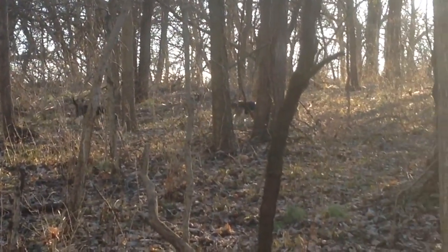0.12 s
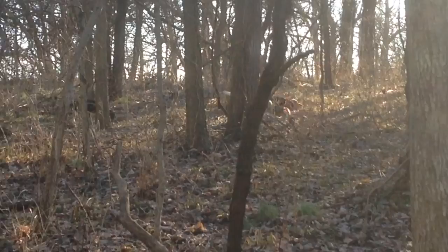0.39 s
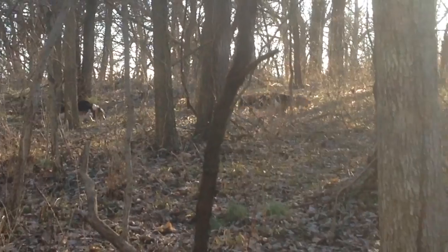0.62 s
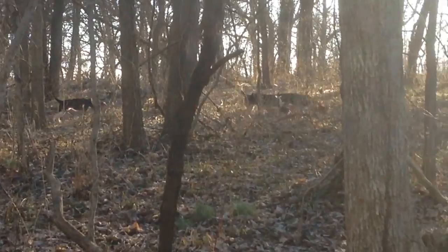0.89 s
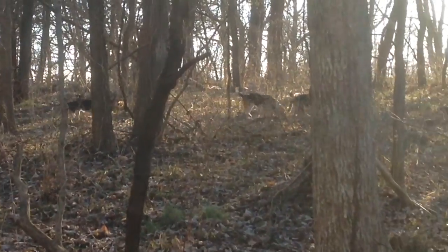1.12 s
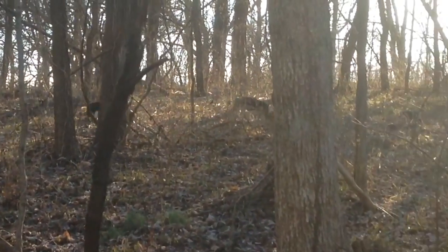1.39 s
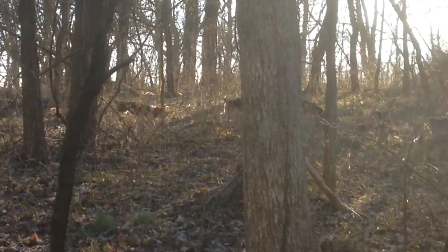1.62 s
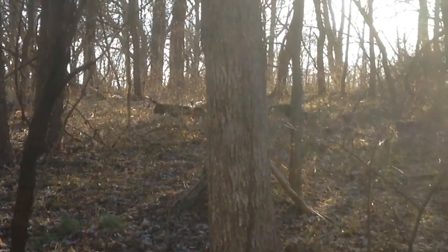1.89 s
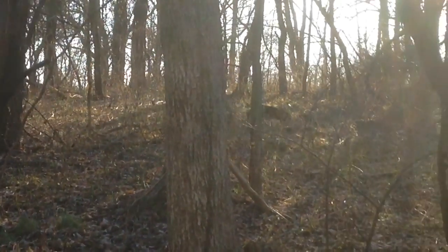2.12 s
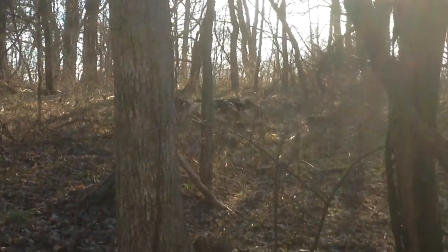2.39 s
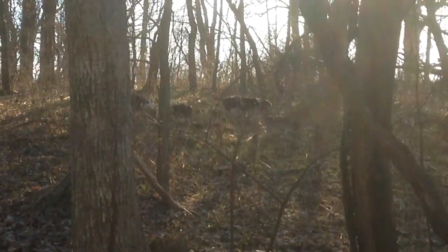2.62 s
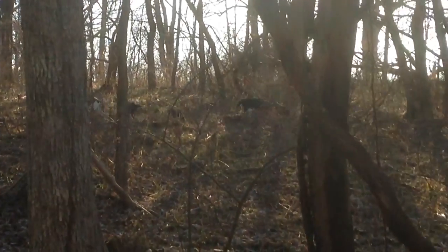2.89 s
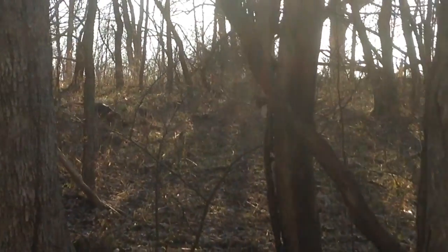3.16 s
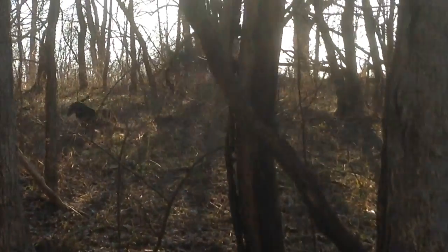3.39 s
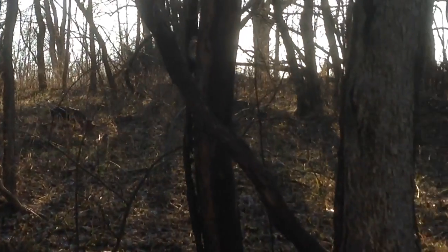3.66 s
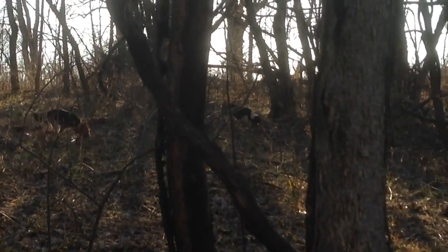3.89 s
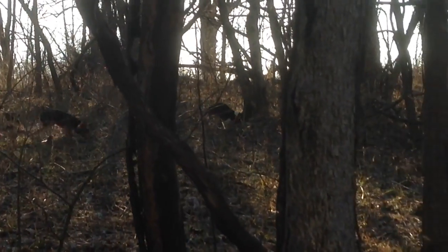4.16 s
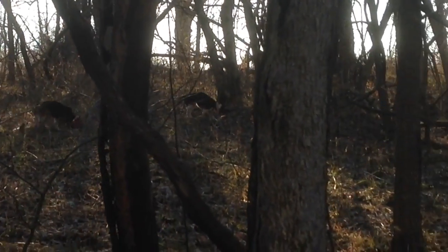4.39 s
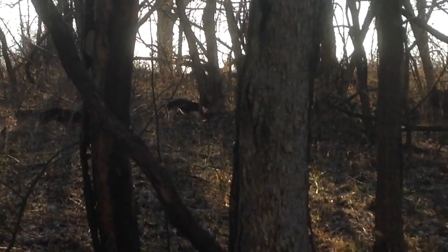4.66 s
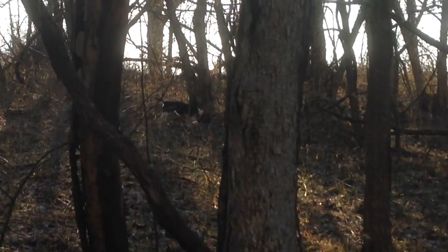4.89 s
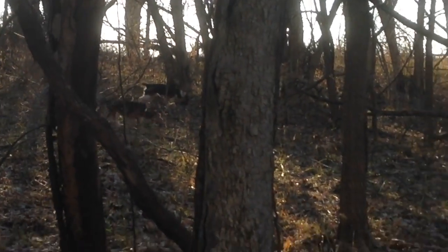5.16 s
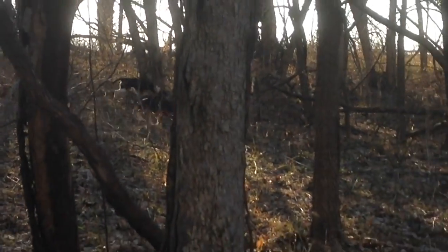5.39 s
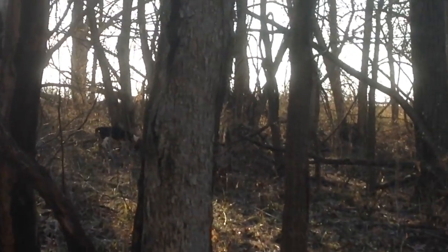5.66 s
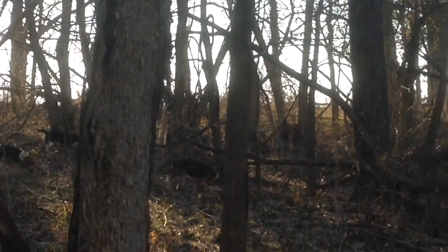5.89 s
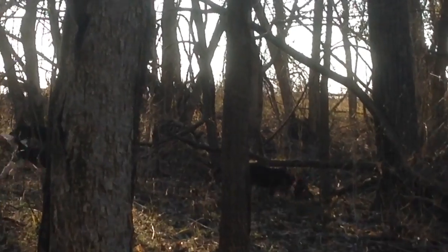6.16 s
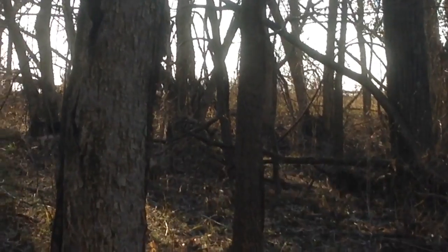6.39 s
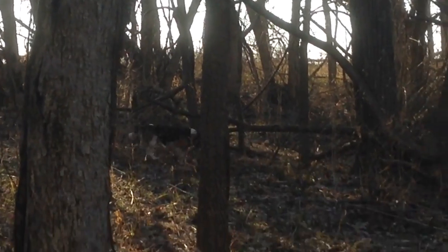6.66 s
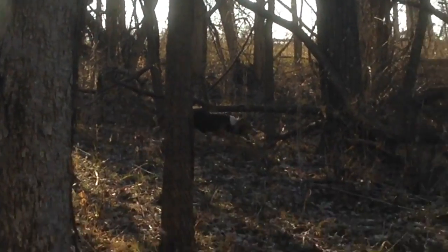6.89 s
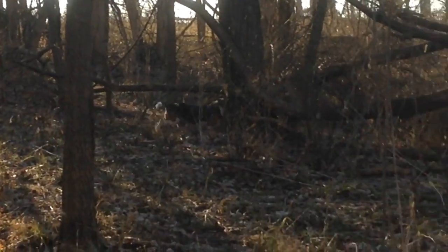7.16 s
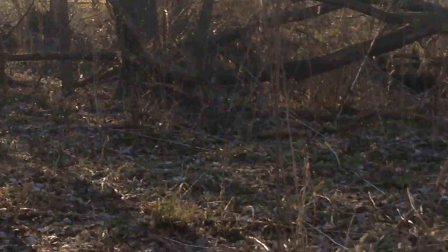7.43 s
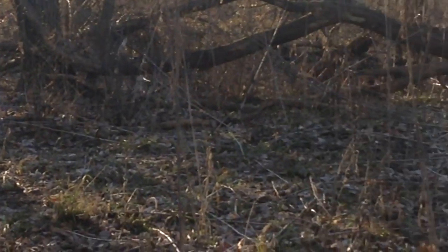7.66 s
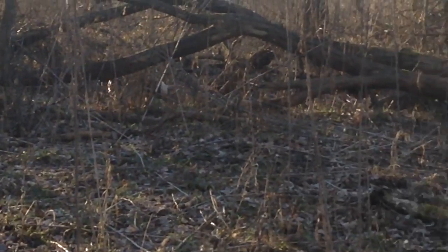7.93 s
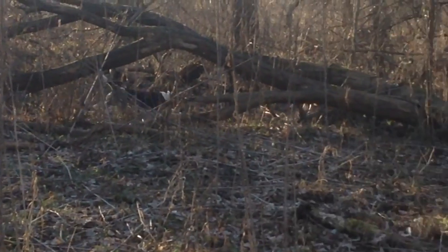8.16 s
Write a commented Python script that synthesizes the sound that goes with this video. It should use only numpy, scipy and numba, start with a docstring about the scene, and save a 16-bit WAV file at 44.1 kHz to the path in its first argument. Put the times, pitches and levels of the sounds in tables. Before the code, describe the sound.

In open bare woodland, several hounds bark and bay on the run some tens of metres from the microphone. From 0 to 0.9 s there are short hoarse barks, a very faint bay and small high yelps. Around 0.9-1.5 s a clear howl rises and another sags, then from 1.7 to 3.3 s rough barks alternate with short hooting bays, some dropping away in pitch, while leaves crackle most near 2.7 s and twigs snap. A brief lull follows; a quick rising howl comes at 3.8 s and faint bird chips around 4 s. From 4.3 s barks are louder, with squeaky yelps near 5 s and a longer wavering howl at 5.2-5.6 s. From 6 s to about 8 s strong barks and bays nearly coincide, with a sharp twig snap at 6.6 s. Every voice leaves a short, dense echo over soft leaf rustle and faint far rumble, which remain at the end, 8.3 s.

```python
"""Bare winter woods: a pack of hounds runs a scent trail some tens of metres away.
Hoarse barks are chaotic pulses and noise through throat resonances; bays and high yelps are wavering partials.
The voices ring on among the trunks as a dense noise tail. Dry leaves crackle, twigs snap as short noise bursts,
a small bird chips in sliding sines, and banded noise rumbles far off."""
import sys
import numpy as np
from scipy import signal
from scipy.io import wavfile
from scipy.ndimage import uniform_filter1d
from numba import njit

SR = 44100
rng = np.random.default_rng(int(sys.argv[2]) if len(sys.argv) > 2 else 0)


def nominal_scale(level):
    """Amplitude ratio for a level in decibels (scalar or array-like)."""
    x = np.asarray(level, float) / 20
    return 10 ** x


def persist_wave(psi):
    """Save psi, clipped to +-1, as 16-bit WAV."""
    counts = np.round(np.clip(psi, -1, 1) * 32767).astype(np.int16)
    wavfile.write(sys.argv[1], SR, np.atleast_2d(counts).T)


N = 365588  # samples, about 8.3 s
T = np.arange(N) / SR


def level(x, db):
    """Set the rms level in dB."""
    return x * nominal_scale(db) / np.sqrt(np.mean(x ** 2))


@njit
def svf(x, hz, width):
    """State-variable band-pass with a moving centre, gain 1 at the centre."""
    y, b, l = np.empty(len(x)), 0., 0.
    for i in range(len(x)):
        g, k = np.tan(np.pi * hz[i] / SR), width / hz[i]
        v = (b + g * (x[i] - l)) / (1 + g * (g + k))
        b, l, y[i] = 2 * v - b, l + 2 * g * v, k * v
    return y


def band(x, hz, width):
    """The same band-pass twice, for steep skirts."""
    hz = hz * np.ones(len(x))
    return svf(svf(x, hz, 1. * width), hz, 1. * width)


def walk(rate, size=N):
    """Smooth chance with spread 1 that changes about rate times a second."""
    k = max(int(SR / rate), 1)
    smooth = uniform_filter1d(uniform_filter1d(rng.standard_normal(size + 4 * k), k), k)
    return smooth[2 * k:2 * k + size] * np.sqrt(1.5 * k)


def calls(curves, voice, rise_s, fall_s):
    """Play each call from its curves, with a soft start and end."""
    out = np.zeros(N)
    for rows in curves:
        s, *columns = np.transpose(rows)
        a, b = int(s[0] * SR), min(int(s[-1] * SR), N)
        t = T[a:b]
        fade = np.clip(np.minimum((t - s[0]) / rise_s, (s[-1] - t) / fall_s), 0, 1)
        out[a:b] += fade * voice(*(np.interp(t, s, c) for c in columns))
    return out


def partials(hz, weights, waver, rasp, settle_s, patchy=0.5):
    """Sines on multiples of a wavering pitch; overtones flutter until the voice settles, and come and go."""
    n = len(hz)
    unrest = np.exp(-(T[:n] / settle_s) ** 3)
    wavering_hz = hz * (1 + waver * (0.65 + unrest) * walk(139.3, n))
    phase = 2 * np.pi * np.cumsum(wavering_hz) / SR

    def flutter(m):
        rough = rasp * (m != 1) * (0.22 + unrest) * walk(206, n)
        patches = patchy * (m > 2) * np.maximum(unrest, m / 12) * walk(28.1, n)
        return 1 + rough + patches

    return np.sqrt(2) * sum(g * flutter(m) * np.sin(m * phase + m * m) for m, g in weights)


# throat resonances around the bark: (centre [Hz], width [Hz], gain [dB])
THROAT_RESONANCES = [(247, 190, -26.5), (538, 92.6, -3.5), (906, 104.5, -11), (1600, 119, -23),
                     (2100, 190, -26.5), (2600, 580, -45.5)]
# mouth resonances that colour the breath: (centre [Hz], width [Hz], gain [dB])
BREATH_RESONANCES = [(2900, 2100, 0), (5010, 1700, 2.5), (7150, 2700, 1), (11250, 7100, -6)]


def bark(hz, db, rasp_db, hiss_db):
    """Vocal folds flap chaotically near the throat resonance: ragged pulses, torn rasp, a rush of breath."""
    n = len(hz)
    phase = np.cumsum(hz * (1 + 0.077 * walk(300, n))) / SR % 1
    flaps = nominal_scale(5.3 * np.tanh(walk(95.0, n))) * (np.exp(-phase / 0.042) - .12)
    folds = level(flaps, 0) + 1.51 * rng.standard_normal(n)
    throat = band(band(folds, hz, 150), hz, 150)
    jaw = 1 + 0.093 * walk(12.9, n)  # the jaw moves the upper resonances
    torn = nominal_scale(3 * np.tanh(walk(70, n)))  # rasp and breath come in uneven bursts
    for centre_hz, width_hz, gain_db in THROAT_RESONANCES:
        if centre_hz > 900:
            throat = throat + nominal_scale(gain_db + rasp_db) * torn * band(folds, centre_hz * jaw, width_hz)
        else:
            throat = throat + nominal_scale(gain_db) * band(folds, centre_hz, width_hz)
    puffs = .5 + np.exp(-phase / 0.21)
    breath = rng.standard_normal(n) * puffs * torn * nominal_scale(2.7 * walk(30, n))
    hiss = sum(nominal_scale(d) * band(breath, f * jaw, w) for f, w, d in BREATH_RESONANCES)
    return nominal_scale(db) * level(throat, 0) + nominal_scale(hiss_db) * level(hiss, 0)


BARK_ATTACK_S, BARK_START_DB, BARK_RELEASE_S, BARK_END_DB = 0.029, -9.5, 0.035, -6.5
HISS_START_DB, HISS_PEAK_AT, HISS_END_DB = -12, 0.55, -8  # the breath peaks at this share of the length
RASP_START_DB, RASP_LAG_S = -4.5, 0.02  # the upper throat joins in late


def bark_shape(s, length, first_hz, last_hz, db, rasp_db, hiss_db):
    """Attack, hold, release; the throat resonance slides steadily, the breath swells and fades."""
    t = np.linspace(0, length, num=16)
    hz = first_hz + (last_hz - first_hz) * t / length
    corners = [0, min(BARK_ATTACK_S, length / 2), max(length - BARK_RELEASE_S, length / 2), length]
    bark_db = db + np.interp(t, corners, [BARK_START_DB, 0, 0, BARK_END_DB])
    late_rasp_db = rasp_db + RASP_START_DB * np.exp(-(t / RASP_LAG_S) ** 2)
    from_peak = t / length - HISS_PEAK_AT
    before_db = HISS_START_DB * (from_peak / HISS_PEAK_AT) ** 2
    after_db = HISS_END_DB * (from_peak / (1 - HISS_PEAK_AT)) ** 2
    swell_db = np.where(from_peak < 0, before_db, after_db)
    return np.c_[s + t, hz, bark_db, late_rasp_db, hiss_db + swell_db]


# hoarse barks: (start [s], length [s], first throat resonance [Hz], last throat resonance [Hz],
# held level [dB], upper throat rasp [dB], peak breath hiss [dB])
HOARSE_BARKS = [(0.081, 0.14, 667, 654.6, -24, 8.5, -60.5), (0.474, 0.22, 680, 663.5, -27, 7.5, -49),
                (0.772, 0.1, 674, 670, -25.5, 8, -51), (1.316, 0.16, 668.4, 635, -21.5, 3.5, -60),
                (1.747, 0.18, 643.4, 629, -23.5, 2.5, -53.5), (2.191, .18, 778, 675, -23, -1, -45),
                (2.689, .15, 779.5, 705, -24, 7.5, -39), (3.237, .16, 690.8, 705, -23, 5, -41.5),
                (4.259, 0.14, 684, 675, -18, 6, -47), (4.697, 0.16, 689, 652.5, -16, -0.5, -55),
                (4.998, 0.087, 672.4, 665, -20.5, 4.5, -58), (5.238, 0.066, 642, 636, -26.5, 11, -68),
                (5.483, 0.15, 652.7, 673.7, -16.5, 3, -55), (5.653, 0.087, 738.5, 719, -29, 15, -72),
                (6.052, 0.14, 688.3, 684.6, -16, 3.5, -46.5), (6.436, 0.19, 688.5, 623, -22.5, 3, -57),
                (6.668, 0.069, 744, 642, -17.5, 3.5, -73), (7.218, 0.14, 716, 627.5, -17.5, 3.5, -51),
                (7.784, 0.17, 745.5, 639.6, -21, 8, -50)]


def barks():
    """Hoarse voices: chaotic folds driving a sliding throat resonance."""
    return calls([bark_shape(*row) for row in HOARSE_BARKS], bark, rise_s=0.012, fall_s=0.02)


MOUTH_WIDTH_HZ, MOUTH_RASP_DB, MOUTH_HISS_DB = 404, -9, -24  # rasp and hiss relative to the overtones
UPPER_THROAT_HZ, UPPER_THROAT_DB = 2700, -26


def bay(hz, db, second_db, upper_db, mouth_hz):
    """A howl: clear fundamental; overtones and breath are shaped by the mouth resonance."""
    n = len(hz)

    def resonance(m, centre_hz, width_hz):
        return 1 / (1 + ((m * hz - centre_hz) / width_hz) ** 2) ** 2

    def overtone(m):
        upper_throat = nominal_scale(UPPER_THROAT_DB) * resonance(m, UPPER_THROAT_HZ, 1800)
        return 0.015 / m + resonance(m, mouth_hz, MOUTH_WIDTH_HZ) + upper_throat

    weights = [(1, nominal_scale(db)), (2, nominal_scale(second_db))]
    weights += [(m, nominal_scale(upper_db) * overtone(m)) for m in range(3, 12)]
    voice = partials(hz, weights, waver=0.01, rasp=0.27, settle_s=0.22)
    breath = rng.standard_normal(n)
    rasp = level(band(breath, 0.96 * mouth_hz, 860), MOUTH_RASP_DB)
    rasp = rasp * (0.28 + np.exp(-(T[:n] / 0.093) ** 2))  # roughest at the onset
    hiss = level(band(breath, 3700, 8300), MOUTH_HISS_DB)
    voice += nominal_scale(upper_db) * (rasp + hiss)
    return nominal_scale(1.8 * walk(30, n)) * voice


BAY_START_DB, BAY_ONSET_S, BAY_ONSET_DB, BAY_END_DB = -20.5, 0.17, -8, -6.5
SCOOP_S = 0.0734  # time constant of the climb to the top pitch
SECOND_FADE_DB_PER_S, OVERTONE_FADE_DB_PER_S = 48.5, 63
MOUTH_OPEN_HZ, MOUTH_CLOSING_HZ_PER_S = 2100, 3800


def bay_shape(s, swell, length, hz, scoop, db, second_db, upper_db):
    """The tone sets in, swells and dies; pitch scoops up; overtones fade as the mouth closes."""
    t = np.linspace(0, length, num=12)
    scooped_hz = hz * (1 - scoop * np.exp(-t / SCOOP_S))
    corners = [0, min(BAY_ONSET_S, swell / 2), swell, length]
    tone_db = db + np.interp(t, corners, [BAY_START_DB, BAY_ONSET_DB, 0, BAY_END_DB])
    from_middle = t - length / 2
    return np.c_[s + t, scooped_hz, tone_db, second_db - SECOND_FADE_DB_PER_S * from_middle,
                 upper_db - OVERTONE_FADE_DB_PER_S * from_middle, MOUTH_OPEN_HZ - MOUTH_CLOSING_HZ_PER_S * t]


# short clear bays: (start [s], swell [s], length [s], top pitch [Hz], start below top pitch [share],
# peak level [dB], second partial at mid-length [dB], upper overtones at mid-length [dB])
CLEAR_BAYS = [(0.0, 0.056, 0.3, 547, 0.13, -37, -56, -70),
              (1.335, 0.0077, 0.14, 589.5, 0.16, -22.5, -34.5, -60),
              (1.719, 0.14, 0.17, 548.7, .14, -16.5, -46.5, -52),
              (2.307, 0.16, 0.16, 504.4, 0.15, -19, -51.5, -44.5),
              (2.919, 0.14, 0.15, 558, .18, -15, -48, -45),
              (6.147, 0.12, 0.13, 556, 0.066, -14.5, -40, -34),
              (6.688, 0.072, 0.16, 558.3, .1, -14, -39.5, -36),
              (7.275, 0.066, 0.13, 546, 0.082, -17.5, -40, -42),
              (7.833, 0.088, 0.14, 528, 0.017, -17.5, -35, -39.5),
              (6.841, 0.03, 0.056, 617, 0.12, -50, -37, -45)]
# howls that follow their own course, one list each: (time [s], pitch [Hz], level [dB],
# second partial [dB], upper overtones [dB], mouth resonance [Hz])
FREE_HOWLS = [
    [(0.86, 470.3, -34, -47, -40.5, 1770), (0.894, 481.3, -22, -24.5, -36, 1770),
     (0.946, 496, -24.5, -43, -45, 1880), (1.0, 526, -20, -60, -58, 1830),
     (1.048, 590, -20, -58, -56, 2670), (1.09, 648, -23, -63, -66, 2600)],
    [(1.03, 527.3, -26, -56, -51, 1600), (1.088, 514, -27, -42, -52, 1600),
     (1.134, 504.3, -24.5, -68, -50.5, 1500), (1.21, 488, -27.5, -42, -47, 1480),
     (1.288, 461, -37, -46, -49, 1490), (1.335, 475, -22.5, -39, -44, 1500)],
    [(3.77, 496, -50, -50, -46, 1600), (3.784, 504, -27, -37.5, -43, 1600),
     (3.83, 532, -21.5, -32.5, -36, 1804), (3.866, 549.5, -16.5, -34, -43.5, 1770),
     (3.91, 571.4, -24, -40, -36, 1860), (3.94, 589, -57, -41, -46, 1750)],
    [(5.6, 533.4, -37, -27, -33.5, 2100), (5.64, 554, -46, -31.5, -36.5, 2320),
     (5.665, 532, -43, -27, -32, 2100), (5.69, 490.5, -38, -34, -39, 2230),
     (5.73, 508, -33, -30, -43, 2140), (5.765, 511.7, -38, -35, -60, 2000), (5.8, 529, -55, -26, -47, 1920)],
    [(5.236, 468, -41, -53, -20, 1950), (5.25, 483, -29.5, -46, -26, 1900),
     (5.265, 484.2, -27.5, -39, -26, 2190), (5.283, 489.3, -26.5, -29, -36, 2200),
     (5.304, 521, -20.5, -42, -28, 1700), (5.348, 545.3, -20, -40, -34, 1700),
     (5.385, 532.5, -21, -30.5, -31.5, 1580), (5.418, 556, -23.5, -31.5, -28.5, 1660),
     (5.458, 551.7, -23.5, -44, -29, 1760), (5.5, 539, -21.5, -40, -34, 1600),
     (5.564, 540.5, -16, -43, -41, 1640), (5.595, 550, -23, -26, -39, 1610)],
]


def bays():
    """Clear voices: a strong fundamental with mouth-shaped overtones."""
    return calls([bay_shape(*row) for row in CLEAR_BAYS] + FREE_HOWLS, bay, rise_s=0.0098, fall_s=0.0096)


# the voice drops away as a bay runs out of breath: (start [s], level before its fades [dB])
BREATH_DROPS = [(1.899, -46), (2.461, -43.5), (3.064, -51)]


def drops():
    """A faint sine that slides down more than an octave."""
    out, t = np.zeros(N), T[:3300]
    slide = np.sin(2 * np.pi * np.cumsum(80 + 400 * np.exp(-t / 0.042)) / SR)
    slide = slide * np.sin(np.pi * t / t[-1]) ** .5 * np.exp(-t / 0.18)
    for s, db in BREATH_DROPS:
        a = int(s * SR)
        out[a:a + len(t)] += nominal_scale(db) * slide
    return out


# partials of a yelp, where 1 is its loud second partial: (multiple [ratio], gain [dB])
YELP_OVERTONES = [(.5, -5), (1, 5), (1.5, -11), (2, -14), (2.5, -25.5)]


def yelp(hz, db, top_db):
    """A thin voice an octave up, with a coarse bright start; its top partials fade or grow apart."""
    weights = [(m, nominal_scale(d + (m > 1) * top_db)) for m, d in YELP_OVERTONES]
    voice = partials(hz, weights, waver=0.0084, rasp=0.68, settle_s=0.24)
    coarse = band(rng.standard_normal(len(hz)), 1.1 * hz, 2500) * np.exp(-(T[:len(hz)] / 0.015) ** 2)
    return nominal_scale(db) * (voice + level(coarse, -14.5))


YELP_ATTACK_S, YELP_START_DB, YELP_END_DB = 0.014, -10, -10.5


def yelp_shape(s, length, first_hz, last_hz, glide_s, db, fade_db_per_s):
    """Quick attack, a glide that eases in and out, then a fade."""
    t = np.linspace(0, length, num=16)
    hz = first_hz + (last_hz - first_hz) * np.sin(np.pi / 2 * np.minimum(t / glide_s, 1)) ** 2
    corners = [0, YELP_ATTACK_S, length / 2, length]
    yelp_db = db + np.interp(t, corners, [YELP_START_DB, 0, 0, YELP_END_DB])
    return np.c_[s + t, hz, yelp_db, -fade_db_per_s * t]


# high yelps, pitched by their loud second partial: (start [s], length [s], first pitch [Hz],
# pitch glided towards [Hz], glide [s], level [dB], fade of the top partials [dB per s])
HIGH_YELPS = [(0.613, 0.076, 1860, 2190, 0.084, -37, -40), (0.742, 0.072, 2316, 2013, 0.062, -41.5, 103),
              (2.314, 0.045, 1962, 1895, 0.063, -34.5, 40), (2.79, 0.048, 1924, 2100, 0.035, -35.5, 99),
              (3.335, 0.068, 2023, 2203, 0.042, -43, 60), (4.827, 0.075, 1820, 2160, 0.072, -38.5, 52),
              (4.954, 0.036, 2420, 2460, 0.037, -36, 58), (4.976, 0.058, 2260, 1915, 0.038, -34.5, 62),
              (5.064, 0.062, 1828, 1801, 0.044, -33, 204), (5.11, 0.08, 1850, 1815, 0.091, -46, 64),
              (5.609, 0.066, 1860, 1967, 0.05, -38, 42), (6.546, 0.14, 1965, 1992, 0.056, -48, 54),
              (6.837, 0.061, 1780, 1928, 0.036, -39.5, 94), (7.371, 0.059, 1898, 1948, 0.034, -38, 120)]


def yelps():
    """High voices, loudest on the second partial."""
    return calls([yelp_shape(*row) for row in HIGH_YELPS], yelp, rise_s=0.004, fall_s=0.015)


# echo of the woods by band: (centre [Hz], time to fall 60 dB [s], gain within the tail [dB])
ECHO_BANDS = [(268, 1.5, -11.5), (650, 0.4, -7), (1065, 1.43, 6.5), (1800, 0.59, 13.5), (5200, 0.36, 13.5),
              (10000, 0.24, -47)]


def woods(x):
    """Trunks scatter the sound back as a dense tail that builds up and loses its treble first."""
    t = T[:2 * SR]
    noise = rng.standard_normal(len(t)) * (1 - np.exp(-t / 0.0027))
    # a full-band noise tail sounds along with the bands and falls 60 dB in 0.42 s
    full_band = nominal_scale(10.5 - 60 * t / 0.42) * noise
    bands = sum(nominal_scale(db - 60 * t / t60) * band(noise, hz, 1.25 * hz) for hz, t60, db in ECHO_BANDS)
    tail = full_band + bands
    tail = nominal_scale(-10) * tail / np.sqrt(np.sum(tail ** 2))  # tail energy -10 dB
    return signal.fftconvolve(x, tail)[:N]


# paws in dry leaves: (time [s], rustle level [dB], lift of its treble [dB])
LEAF_RUSTLE = [(0.0, -59, 0), (0.51, -62.5, -3.5), (0.74, -48, -3.5), (1.57, -64, -1), (2.24, -62.5, 0.5),
               (2.35, -51, -2.5), (2.67, -58, 3.5), (2.7, -38.5, -1), (2.79, -53, 2.5), (3.55, -61, 2.5),
               (4.2, -59.5, 4.5), (4.901, -56.5, 1.5), (6.12, -54, -0.5), (6.39, -55.5, -1.5),
               (6.74, -47, 0), (6.9, -52, 0.5), (7.18, -56, 0), (7.341, -56, 11), (7.62, -56.5, 2),
               (8.29, -56.5, 2)]


def leaves():
    """Dense tiny crackles of uneven size over a soft hiss."""
    sizes = rng.standard_normal(N) * nominal_scale(4.3 * np.minimum(rng.exponential(size=N), 4))
    crackle = (rng.random(N) < 900 / SR) * sizes  # about 900 a second
    grains = level(crackle, -4.5) + rng.standard_normal(N) * nominal_scale(3.3 * walk(10.4))
    s, db, treble_db = np.transpose(LEAF_RUSTLE)
    treble = nominal_scale(np.interp(T, s, treble_db)) * band(grains, 9860, 26000)
    middle = nominal_scale(3.5) * band(grains, 3400, 8500)
    low = nominal_scale(10.5) * band(grains, 890, 2160)
    return level(treble + middle + low, 0) * nominal_scale(np.interp(T, s, db))


# twig snaps: (time [s], burst level before the band-pass [dB])
TWIG_SNAPS = [(2.4603, -41.5), (2.589, -45), (2.679, -31), (2.724, -41), (2.936, -32), (3.1914, -41),
              (3.542, -43), (7.615, -43), (5.1827, -39), (5.56, -41), (5.688, -32), (6.5992, -27.5),
              (7.152, -37.5), (7.169, -39), (3.713, -42.5)]


def snaps():
    """Each twig breaks with a bright tick and a weaker noise tail that dies over some tens of milliseconds."""
    out, t = np.zeros(N + 2000), T[:2000]
    for s, db in TWIG_SNAPS:
        a = int(s * SR)
        tick_and_tail = np.exp(-t / 0.00049) + 0.34 * np.exp(-t / 0.02)
        out[a:a + len(t)] += nominal_scale(db) * rng.standard_normal(len(t)) * tick_and_tail
    return band(out[:N], 10300, 19000)


def chip(hz, db):
    """A thin wavering whistle."""
    return nominal_scale(db) * partials(hz, [(1, 1)], waver=.003, rasp=0, settle_s=1)


CHIP_ATTACK_S, CHIP_START_DB, CHIP_END_DB = .008, -10, -6


def chip_shape(s, length, hz, rise, db):
    """Quick attack, an upward slide, then a fade."""
    return [(s, hz, db + CHIP_START_DB),
            (s + CHIP_ATTACK_S, hz * (1 + rise * CHIP_ATTACK_S / length), db),
            (s + length, hz * (1 + rise), db + CHIP_END_DB)]


# bird chips: (start [s], length [s], first pitch [Hz], rise in pitch [share], peak level [dB])
BIRD_CHIPS = [(3.922, 0.033, 5460, 0.058, -51.5), (4.15, 0.019, 5830, 0.11, -51),
              (5.819, 0.057, 4900, 0.073, -44.5), (6.87, 0.04, 5140, 0.083, -45.5),
              (7.42, 0.059, 5400, 0.12, -53.5)]


def chips():
    """A small bird: short whistles that slide upward."""
    return calls([chip_shape(*row) for row in BIRD_CHIPS], chip, rise_s=0.0049, fall_s=0.0041)


# colour of the rumble: (frequency [Hz], relative density [dB per Hz])
RUMBLE_COLOUR = [(18, -37), (30, -7), (129, -1), (223, -2), (389, -12), (430, -35), (560, -33), (950, -120)]
# distant rumble: (time [s], level [dB])
RUMBLE_LEVEL = [(0.0, -56), (4.71, -57.5), (4.95, -60.5), (5.66, -65.5), (7.09, -63), (8.29, -55.5)]


def rumble():
    """Far rumble in half-octave bands that swell together and flicker alone."""
    out, (f, d) = 0, np.transpose(RUMBLE_COLOUR)
    swell = walk(1.7)
    for hz in 35 * 2 ** np.arange(0, 4, .5):
        band_db = np.interp(np.log(hz), np.log(f), d) + 10 * np.log10(hz)
        moving_db = band_db + 1.5 * swell + 1.97 * walk(4)
        out = out + nominal_scale(moving_db) * level(band(rng.standard_normal(N), hz, hz / 2), 0)
    return level(out, 0) * nominal_scale(np.interp(T, *np.transpose(RUMBLE_LEVEL)))


def scene():
    """Voices and their echo over the ground sounds and the rumble."""
    voices = barks() + bays() + drops() + yelps() + chips()
    return (voices + woods(voices) + leaves() + snaps() + rumble())[None]


def roll_off(x):
    """The treble ends steeply here."""
    return signal.sosfilt(signal.butter(12, 15800, fs=SR, output="sos"), x)


def record(dry):
    """The microphone drops the very top and the deepest bass."""
    no_top = signal.sosfilt(signal.ellip(8, .2, 60, 15300, fs=SR, output="sos"), dry)
    mix = signal.sosfilt(signal.butter(3, 45, "high", fs=SR, output="sos"), no_top)
    return roll_off(mix)


dry = scene()
out = record(dry)
persist_wave(out)
```